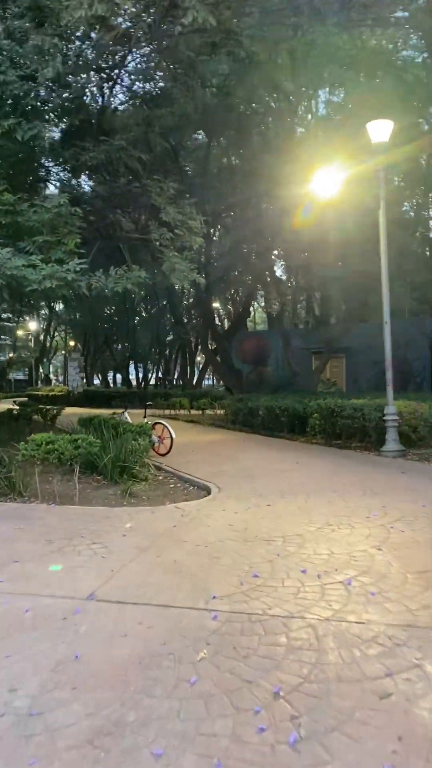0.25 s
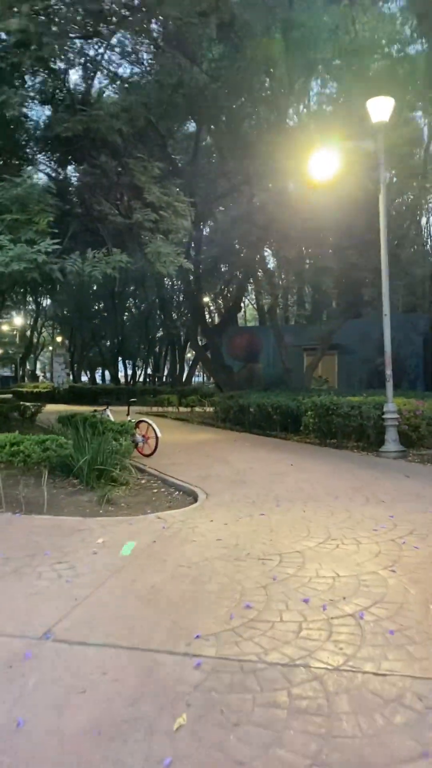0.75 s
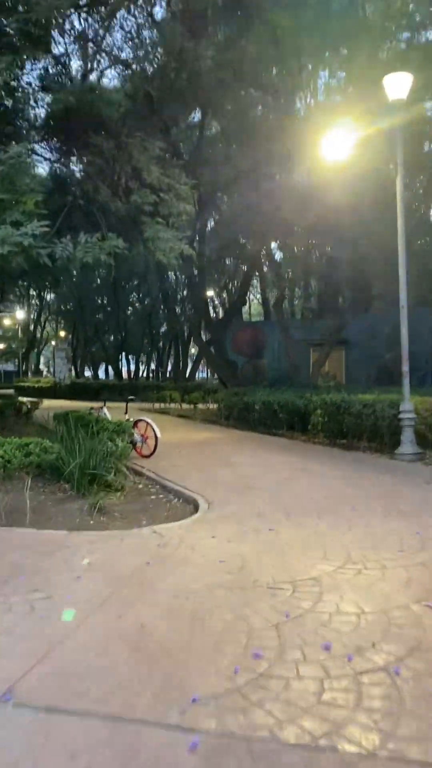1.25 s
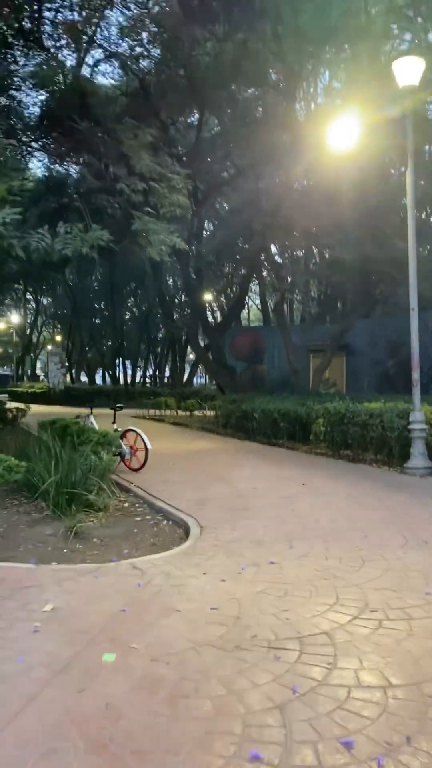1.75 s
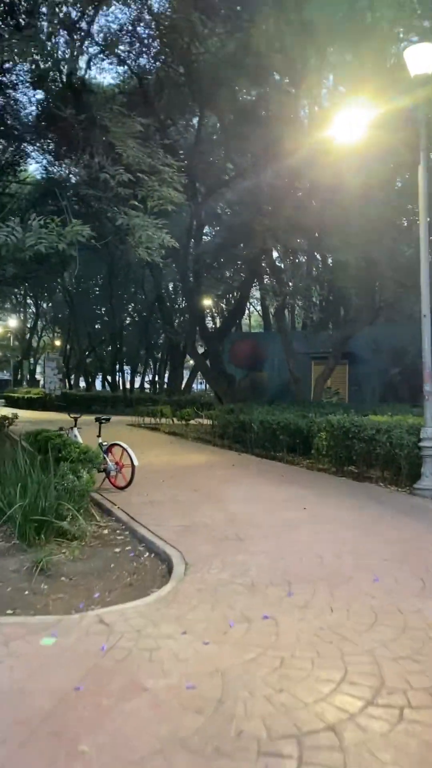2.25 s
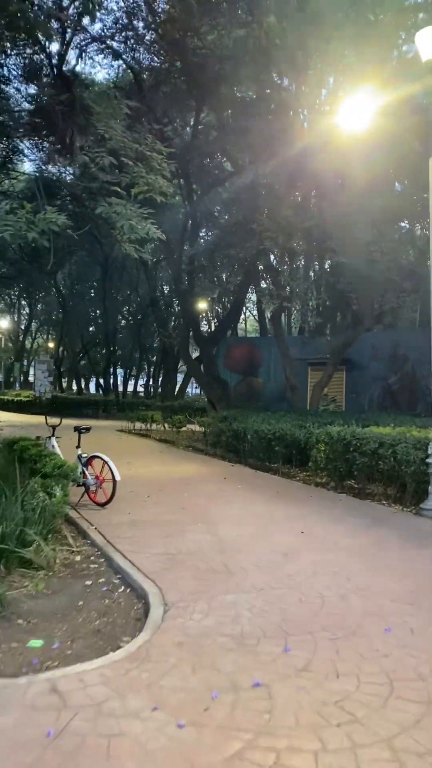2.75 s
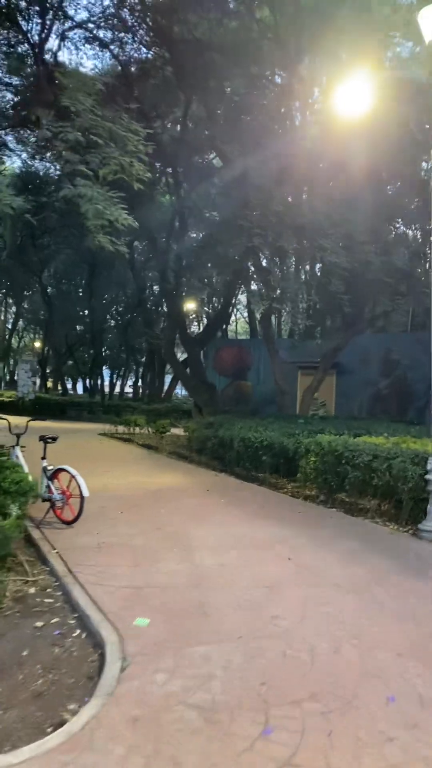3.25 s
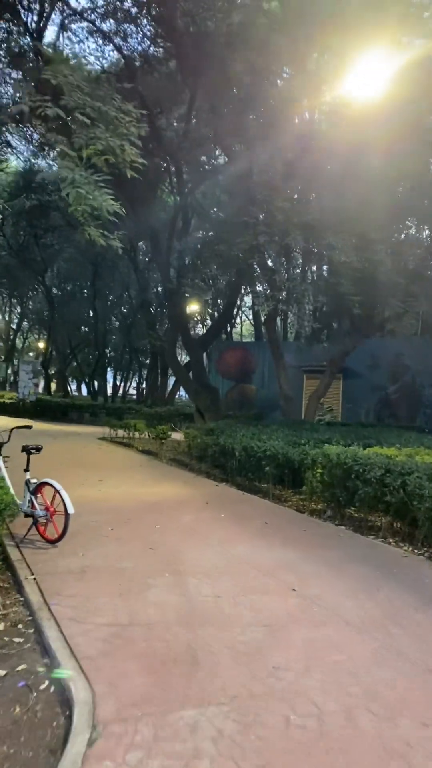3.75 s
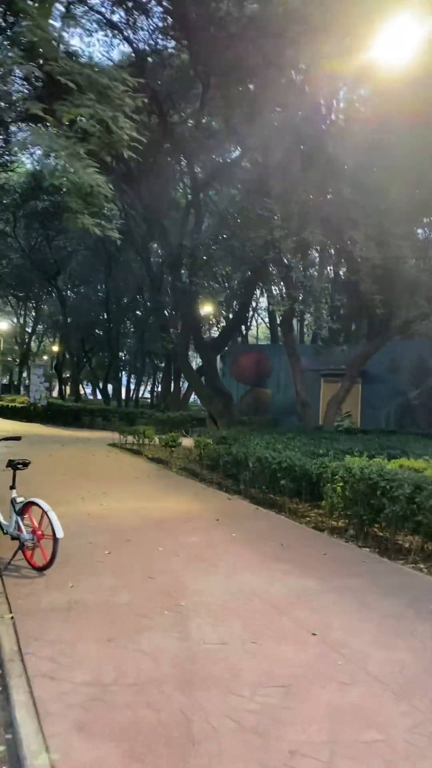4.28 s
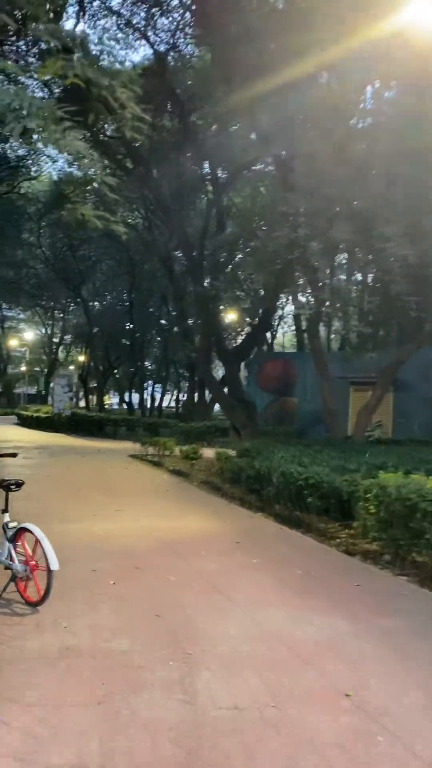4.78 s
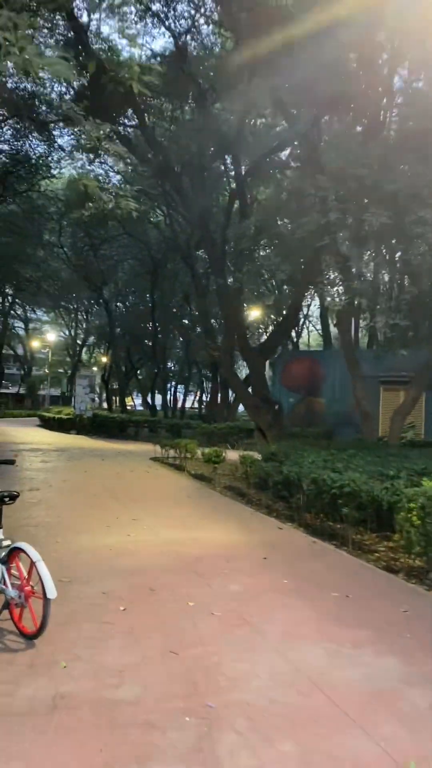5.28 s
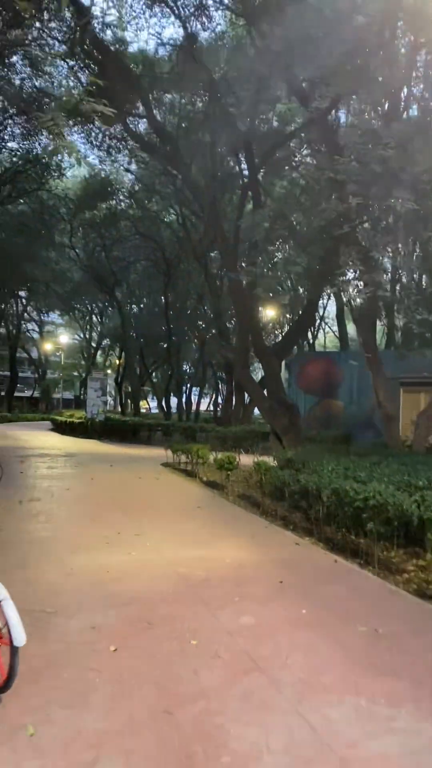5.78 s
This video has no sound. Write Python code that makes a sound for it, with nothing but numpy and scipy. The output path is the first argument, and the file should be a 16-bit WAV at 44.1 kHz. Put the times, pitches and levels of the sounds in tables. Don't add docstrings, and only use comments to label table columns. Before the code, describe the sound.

Outdoors in a tree-lined park, a low, lumpy traffic rumble runs throughout. Distant sparrows chirp in overlapping, echoing flurries, with sharper chirrups from trees beside the path. A close bird gives a quick bright phrase at about 2.5 seconds and repeats it near 4.5. Soft soles tick and scrape grit on paving, with dull low bumps, heard from a slow walker's handheld stereo microphone.

```python
import sys
import numpy as np
from scipy import signal
from scipy.fft import rfft, irfft
from scipy.io import wavfile
from scipy.ndimage import uniform_filter1d

SR = 44100
rng = np.random.default_rng(int(sys.argv[2]) if len(sys.argv) > 2 else 0)


def generate_wav(signal):
    frames = np.transpose(np.atleast_2d(signal))
    scaled = np.clip(frames, -1, 1) * 32767
    pcm = np.round(scaled).astype(np.int16)
    wavfile.write(sys.argv[1], SR, pcm)


def gain_from_db(level_db):
    decades = np.asarray(level_db, float) / 20
    return 10 ** decades


N = 265482


def in_time(rows):
    time_s, *columns = np.transpose(rows)
    return [np.interp(np.arange(N) / SR, time_s, column) for column in columns]


def at_hz(points):
    hz = np.maximum(np.arange(N // 2 + 1) * SR / N, 1)
    points = np.array(points)
    return np.interp(np.log(hz), np.log(np.maximum(points[:, 0], 1)), points[:, 1])


def rms_one(x):
    return x / np.sqrt(np.mean(x ** 2) + 1e-20)


def band(x, low_hz, high_hz, order=2):
    return signal.sosfilt(signal.butter(order, [low_hz, high_hz], "band", fs=SR, output="sos"), x)


def drift(rate, size):
    knots = rng.standard_normal(int(size * rate / SR) + 2)
    return np.interp(np.arange(size) * rate / SR, np.arange(len(knots)), knots)


def add(track, sound, start_s):
    i = int(start_s * SR)
    track[i:i + len(sound)] += sound[:max(N - i, 0)]


def ports(first, second, likeness):
    # pitch_hz, left_lead_rad
    phase = [(60, 0), (130, -1.3), (250, -1.5), (500, -1.5), (900, -2.2), (1290, -5), (1800, -5.7),
             (2760, -4.9), (3900, -5.1), (4650, -4.2), (5340, -5.8), (6030, -5.5), (7400, -4.7),
             (10200, -3.4), (12000, -3)]
    # pitch_hz, left_minus_right_db
    balance = [(60, 1.5), (160, 1), (410, 0), (1090, -4.5), (2500, 0), (4600, -4.5), (5700, 0),
               (7500, -0.5), (10500, -2)]
    left, other = rfft(first), rfft(second)
    tilt = gain_from_db(at_hz(balance) / 2)
    alike = np.clip(likeness, 0, 1)
    shared = alike * left * np.exp(-1j * at_hz(phase))
    right = shared + np.sqrt(1 - alike ** 2) * other
    return np.array([irfft(left * tilt, N), irfft(right / tilt, N)])


def city():
    # pitch_hz, level_db_per_hz
    city_colour = [(13, -37.5), (22, -12.5), (53, -1.5), (85, -1.5), (179, -15), (315, -22.5), (374, -25.5),
                   (568, -27), (783, -26.5), (1000, -32.5), (1810, -40.5), (2820, -43), (3980, -46),
                   (4610, -46), (7930, -74.5), (10300, -102), (17400, -120)]
    # pitch_hz, width_hz, over_rumble_db
    drones = [(62, 11, 2.5), (315.4, 24, 6), (493, 36, 6), (786.3, 19, 6.5)]
    # pitch_hz, likeness (0-1)
    port_likeness = [(60, 0.48), (130, 0.54), (250, 0.5), (450, 0.46), (900, 0.35), (1900, 0.6),
                     (4000, 0.92), (8000, 0.1)]
    # time_s, level_db
    traffic = [(0, 2.5), (.3, 2), (1.0, 1), (1.8, -0.5), (2.5, -2), (3.1, -1), (3.8, -1.5), (4.7, -2.5),
               (5.15, -1.5), (6.02, -2)]
    # time_s, depth_db
    ducks = [(.07, 8.5), (.70, 3.5), (1.23, 9.5), (1.36, 5), (1.90, 1.5), (2.28, -2), (3.17, 5.5),
             (5.12, 8), (5.47, 3), (5.78, 0)]
    duck_s = 0.046
    hz = np.arange(N // 2 + 1) * SR / N
    colour = gain_from_db(at_hz(city_colour))
    for centre_hz, width_hz, db in drones:
        colour = colour * gain_from_db(db / (1 + (2 * (hz - centre_hz) / width_hz) ** 2))
    pair = rfft(ports(*rng.standard_normal((2, N)), at_hz(port_likeness))) * colour
    part = np.digitize(hz, [130, 430, 1300])
    deep, low, middle, high = [rms_one(irfft(pair * (part == k), N)) for k in range(4)]
    swell_db, = in_time(traffic)
    t = np.arange(N) / SR
    ducked_db = sum(db * np.exp(-((t - s) / duck_s) ** 2) for s, db in ducks)
    deep_db = -41.5 + 1.5 * drift(11, N)
    low_db = -48.5 + swell_db - ducked_db
    middle_db = -55.5 + 0.8 * swell_db
    high_db = -64.5 + 1.1 * swell_db
    gusts = gain_from_db(1.4 * drift(6, N))
    upper = gain_from_db(middle_db) * middle + gain_from_db(high_db) * band(high, 500, 5700)
    return gain_from_db(deep_db) * deep + gain_from_db(low_db) * low + gusts * upper


def whistle(length_s, hz, waver, flutter_db, buzz):
    octave_db, breath_db = -32, -18
    size = int(length_s * SR)
    u = np.arange(size) / size
    pitch_hz = np.interp(u, np.linspace(0, 1, len(hz)), hz) * (1 + waver * drift(500, size))
    phase = 2 * np.pi * np.cumsum(pitch_hz) / SR
    beat_hz = 750 * (1 + .25 * drift(150, size))
    beat = 1 + buzz * np.sin(2 * np.pi * np.cumsum(beat_hz) / SR)
    breath = 1 + gain_from_db(breath_db) * drift(9000, size)
    shape = np.sqrt(2 * np.sin(np.pi * u)) * gain_from_db(flutter_db * drift(250, size))
    return shape * beat * breath * (np.sin(phase) + gain_from_db(octave_db) * np.sin(2 * phase))


def flock(level_db, low_hz, high_hz, count):
    out = np.zeros(N)
    for when, place, bend, slide, length, size in rng.random((count, 6)):
        glide = 1 + np.array([0, 0.23 * bend - .07, 0.34 * slide - .12])
        hz = glide * (low_hz + (high_hz - low_hz) * place ** 1.3)
        chirp = whistle(.02 + .04 * length, hz, waver=.025, flutter_db=4.3, buzz=0.16)
        add(out, gain_from_db(-8 * size) * chirp, when * N / SR)
    return gain_from_db(level_db) * rms_one(out)


def far_flocks():
    # time_s, level_db
    low_flock = [(0, -58.5), (.15, -68), (.36, -89.5), (.57, -63), (.75, -62.5), (.95, -67.5),
                 (1.22, -63.5), (1.6, -91), (2.0, -73), (2.55, -70), (3.3, -62.5), (3.62, -69.5),
                 (4.0, -64.5), (4.8, -77), (4.93, -62.5), (5.15, -62), (5.6, -76), (6.02, -69.5)]
    # time_s, level_db
    high_flock = [(0, -67), (.2, -95), (.55, -99), (.75, -75.5), (1.02, -83), (1.12, -68.5), (1.4, -80),
                  (1.8, -99), (1.95, -73.5), (2.3, -97), (2.47, -65), (2.7, -85.5), (2.93, -76),
                  (3.5, -80.5), (4.1, -86.5), (4.5, -80), (5.13, -73), (6.02, -96.5)]
    (low_db,), (high_db,) = in_time(low_flock), in_time(high_flock)
    return flock(low_db, 3200, 4700, count=600) + flock(high_db, 5100, 6300, count=300)


def birds(notes, waver, flutter_db, buzz):
    out = np.zeros(N)
    for s, length_s, *hz, db in notes:
        add(out, gain_from_db(db) * whistle(length_s, hz, waver, flutter_db, buzz), s)
    return signal.sosfilt(signal.butter(8, 7340, fs=SR, output="sos"), out)


def phrase(start_s, level_db, notes):
    early_share = 0.621
    placed = []
    for after_s, length_s, first_hz, last_hz, db in notes:
        middle_hz = first_hz + early_share * (last_hz - first_hz)
        placed.append((start_s + after_s, length_s, first_hz, middle_hz, last_hz, level_db + db))
    return placed


def further_birds():
    # start_s, length_s, pitch_hz, level_db
    held = [(0.101, 0.013, 3800, -59.5), (0.111, .023, 3180, -78), (0.172, 0.022, 3316, -61.5),
            (0.17, .022, 3870, -65.5), (.116, .01, 3850, -60), (.146, .012, 3440, -59),
            (.585, 0.04, 5350, -77.5), (.73, .03, 4300, -73.5), (0.582, 0.033, 6000, -74),
            (0.605, 0.037, 6130, -72.5), (.66, 0.056, 5630, -77), (0.68, 0.068, 6030, -78.5),
            (1.03, .046, 7300, -82), (1.048, 0.024, 3700, -68), (1.054, 0.014, 6400, -67.5),
            (1.074, .01, 6500, -71), (1.285, 0.02, 5300, -71.5), (1.291, 0.014, 4400, -67),
            (1.325, 0.037, 3800, -72), (1.937, 0.026, 4100, -67.5), (2.366, 0.026, 6200, -70.5),
            (3.1, 0.03, 2500, -75.5), (3.1, 0.016, 5300, -76.5), (2.836, .03, 4400, -75),
            (2.906, .04, 4900, -71), (2.905, .03, 5400, -78.5), (2.875, 0.035, 4370, -69),
            (2.78, .05, 7900, -81), (5.712, .018, 4650, -73), (5.692, .012, 3900, -70),
            (5.96, 0.018, 3450, -75), (3.079, 0.0098, 7700, -88), (3.08, 0.016, 4690, -67),
            (3.08, 0.015, 5170, -71.5), (3.099, 0.034, 4050, -66.5), (3.173, 0.072, 6070, -74.5),
            (3.70, 0.04, 5880, -76), (3.743, .05, 6080, -78.5), (4.4, 0.035, 4100, -78),
            (4.240, 0.077, 5940, -90), (4.892, 0.057, 4040, -67.5), (4.992, 0.06, 4270, -70.5)]
    # start_s, first_hz, pitch_change_percent, level_db
    strokes = [(0, 5900, -8, -74), (0, 4500, -7.5, -65.5), (0, 3500, 0.5, -69), (.045, 5800, 3.5, -75),
               (.079, 4400, -12.5, -64.5), (0.125, 3200, 5, -70.5), (.900, 3700, 11, -67.5),
               (1.020, 4920, 6, -74), (1.095, 4650, -3, -64.5), (1.13, 5420, -6.5, -70.5),
               (1.165, 3700, 6, -70), (1.175, 4870, 2.5, -71), (2.000, 3730, -11.5, -71),
               (3.15, 3900, -14, -66.5), (3.165, 3300, -3.5, -68.5), (3.839, 4100, -15.5, -67),
               (4.868, 4300, 4, -64), (4.895, 3750, -5, -68), (4.94, 4000, -4.5, -65),
               (5.095, 3200, -6.5, -66), (5.118, 2940, -8, -69), (5.696, 4000, 18.5, -76)]
    stroke_s = .024
    notes = [(s, length_s, hz, hz, db) for s, length_s, hz, db in held]
    notes += [(s, stroke_s, hz, hz * (1 + change / 100), db) for s, hz, change, db in strokes]
    return birds(phrase(0, 0, notes), waver=.022, flutter_db=3.5, buzz=.4)


def puff(level_db, decay_ms):
    t = np.arange(int(.12 * SR)) / SR
    out = rng.standard_normal(len(t)) * np.exp(-1000 * t / decay_ms)
    out[0] = 5
    return gain_from_db(level_db) * out


def steps():
    # start_s, peak_db, share_3_to_5_khz_db, decay_ms
    sole_ticks = [(0.0755, -49.5, -10, 1.7), (0.097, -50.5, -4.5, 2.3), (0.7026, -50, -10, 4.8),
                  (1.3199, -46, -21, 2.9), (1.342, -53.5, -17, 6.5), (1.43, -61, -11, 3.1),
                  (1.8945, -46, 2.5, 6.9), (2.0735, -54, 1.5, 4.6), (2.106, -58, -14, 2),
                  (2.3033, -54, 7.5, 1.4), (2.3145, -65, 5, 1.2), (2.3285, -50, 2, 1.5),
                  (2.5152, -49, -11, 5.5), (2.5253, -50, 5, 2.8), (2.5304, -50.5, -2.5, 5.6),
                  (2.6668, -57, 1, 2.5), (3.186, -56, -9, 3.3), (3.335, -58, 3, 2.5),
                  (3.8445, -48.5, -9, 2.1), (3.8684, -51, -25, 2.5), (3.9721, -53.5, -11.5, 6.2),
                  (4.646, -65, 0, 2.5), (5.103, -51, -6, 2.96), (5.1165, -53, -7, 2.5),
                  (5.13, -47, -8, 1.2), (5.727, -53, -14, 2.8), (5.746, -55, -12, 2.46),
                  (5.872, -62, -6, 1.5), (5.8544, -64, 5, 2.2), (5.9208, -61, -2, 2.13)]
    # start_s, level_db, decay_ms
    grit = [(.750, -86.5, 15), (1.444, -79, 13), (1.893, -67.5, 5.3), (1.905, -71.5, 19), (1.935, -80, 15),
            (2.074, -84.5, 3), (2.105, -78.5, 3), (2.208, -76, .8), (2.3035, -56, .8), (2.312, -72, .8),
            (2.318, -66, .8), (2.301, -72, .6), (2.3285, -57, .8), (2.351, -62, .7), (2.360, -73, 24),
            (2.730, -87, 30)]
    dull, sharp, bright = np.zeros((3, N))
    for s, db, sharp_db, decay_ms in sole_ticks:
        knock = puff(db, np.clip(decay_ms, .5, 5))
        add(dull, knock * gain_from_db(8.5), s)
        add(sharp, knock * gain_from_db(sharp_db + 7.5), s)
    for s, db, decay_ms in grit:
        add(bright, puff(db + 14, decay_ms), s)
    ticks = band(dull, 920, 3600, order=3) + band(sharp, 2900, 4900, order=3)
    ticks = ticks + band(bright, 5800, 10800, order=3)
    return ticks + 0.2 * np.roll(ticks, int(.00055 * SR))


def thuds():
    # centre_s, level_db, pitch_hz
    bumps = [(0.232, -31, 62), (1.436, -32, 60), (1.615, -30, 60), (2.01, -36, 64.7), (2.325, -32, 71),
             (3.24, -37.5, 69), (4.535, -28, 62), (5.199, -36, 61), (5.408, -34, 58.6), (5.78, -26.5, 63.7)]
    spread_s, phase_rad = 0.016, 0.36
    out, t = np.zeros(N), np.arange(-.05 * SR, .05 * SR) / SR
    for s, db, hz in bumps:
        bell = np.exp(-(t / spread_s) ** 2)
        add(out, gain_from_db(db + 0.5) * bell * np.cos(2 * np.pi * hz * t + phase_rad), s + t[0])
    return out


def chirrup(start_s, level_db, top_hz, length_s):
    arch_hz = [3404, 3564, 3700, 4025, 3533, 3300, 3150]
    spike_s, foot_hz, spike_db = 0.006, 4000, -3
    arch = (start_s + .003 - length_s / 2, length_s, *arch_hz, level_db - 3.0)
    spike = (start_s, spike_s, top_hz, (top_hz + foot_hz) / 2 + 150, foot_hz, level_db + spike_db)
    return [arch, spike]


def middle_birds():
    # spike_s, level_db, spike_top_hz, length_s
    chirrups = [(0.644, -58.5, 5280, 0.05), (1.088, -56.5, 5070, 0.054), (3.229, -58, 4720, .05),
                (3.764, -58, 4970, 0.055)]
    # start_s, length_s, first_hz, last_hz, level_db
    quick_strokes = [(0.65, 0.018, 4500, 4600, -60.5), (0.62, .01, 3550, 3200, -58),
                     (0.53, .008, 4400, 4200, -64), (0.94, .008, 3900, 4400, -64),
                     (0.84, 0.0083, 3900, 2500, -61), (.679, 0.011, 5000, 3100, -60),
                     (.697, 0.024, 3600, 4100, -61.5), (0.62, 0.018, 2700, 3830, -65),
                     (1.113, .007, 4600, 4300, -55), (1, 0.0098, 5000, 3300, -53),
                     (1.164, .008, 3000, 3400, -60), (0.99, .01, 5700, 5900, -67),
                     (1.1, 0.011, 6200, 5000, -72), (1.128, 0.019, 2900, 3070, -64.5),
                     (1.144, 0.014, 3900, 3700, -58), (1.3, 0.013, 4700, 2810, -60),
                     (1.124, 0.018, 4600, 5300, -65), (3.26, 0.015, 4300, 4000, -55),
                     (3.278, 0.009, 2900, 2500, -62.5), (3.238, .01, 3600, 3500, -63.5),
                     (3.297, 0.0073, 4700, 4300, -62), (3.291, 0.017, 3150, 4100, -56.5),
                     (3.330, 0.014, 4500, 3600, -65.5), (3.763, .012, 4000, 4700, -55),
                     (3.790, 0.013, 5600, 4300, -61.5), (3.776, 0.0092, 4450, 4600, -62),
                     (3.797, 0.018, 5000, 4550, -62), (3.812, 0.014, 4300, 5500, -64.5),
                     (3.4, 0.015, 3000, 3800, -60.5), (4.960, 0.018, 3500, 3200, -62.5),
                     (5.5, .018, 5800, 4200, -65.5), (4.979, .022, 2800, 3800, -65),
                     (5.030, 0.017, 3850, 4600, -65)]
    notes = [note for call in chirrups for note in chirrup(*call)] + phrase(0, 0, quick_strokes)
    return gain_from_db(2.5) * birds(notes, waver=.014, flutter_db=3.0, buzz=.2)


def close_bird():
    # long_note_s, level_db
    songs = [
        (2.480, -44),
        (4.557, -44),
    ]
    # after_s, length_s, first_hz, last_hz, level_db
    song_clear = [
        (.003, .03, 4523, 4543, 3),
        (0.088, .018, 5490, 5460, -10.5),
    ]
    # after_s, length_s, first_hz, last_hz, level_db
    song_buzzy = [(-.021, 0.023, 5350, 5600, -15.5), (-0.008, 0.01, 6000, 4900, -10.5),
                  (0.038, .017, 5000, 3400, -9), (0.054, 0.015, 4300, 6700, -10.5),
                  (.062, 0.033, 6600, 6800, -12.5), (0.062, 0.016, 6750, 6900, -14),
                  (0.083, .028, 7200, 5000, -20.5), (0.11, 0.019, 3480, 3600, -14),
                  (-0.023, 0.021, 3030, 3200, -22), (0.041, 0.02, 4550, 4700, -5),
                  (.004, 0.0087, 4400, 3400, -18), (0.097, 0.018, 5500, 4400, -13.5),
                  (0.077, 0.013, 2200, 3100, -23.5)]
    # after_s, length_s, first_hz, last_hz, level_db
    song_hoarse = [(.055, .032, 3750, 3450, -10), (.058, .008, 3400, 5700, -12),
                   (.034, 0.0055, 5200, 3800, -9.5), (-0.024, 0.006, 7000, 4900, -14.5),
                   (.104, .02, 5500, 5450, -15), (0.086, .009, 3400, 2400, -15.5)]
    # start_s, length_s, first_hz, last_hz, level_db
    song_changes = [(2.449, .013, 4100, 4250, -51.5), (2.474, 0.012, 3300, 4450, -49.5),
                    (2.51, 0.01, 4110, 3900, -49), (2.519, .011, 4300, 3940, -46),
                    (2.510, .022, 7950, 7900, -57.5), (4.538, 0.016, 3730, 4100, -56.5),
                    (4.536, 0.011, 5600, 6900, -57.5), (4.626, .014, 4500, 3300, -56),
                    (2.588, 0.015, 3520, 4400, -55.5), (4.55, 0.028, 3800, 4500, -50.5),
                    (4.58, .013, 4600, 3950, -42.5), (4.594, 0.023, 3830, 4000, -48),
                    (4.606, 0.015, 5000, 5660, -56), (4.614, 0.013, 4970, 2780, -50.5)]
    # spike_s, level_db, spike_top_hz, length_s
    close_chirrups = [
        (2.415, -49.5, 5180, .06),
        (4.491, -61.5, 5040, .062),
    ]
    clear, buzzy, hoarse = [[note for s, db in songs for note in phrase(s, db, template)]
                            for template in (song_clear, song_buzzy, song_hoarse)]
    clear += phrase(0, 0, song_changes)
    clear += [note for call in close_chirrups for note in chirrup(*call)]
    out = birds(clear, waver=.009, flutter_db=2.5, buzz=.1)
    out = out + birds(buzzy, waver=.03, flutter_db=3.5, buzz=.55)
    return out + birds(hoarse, waver=.035, flutter_db=5, buzz=.25)


def song_air():
    # start_s, length_s, level_db
    puffs = [
        (2.455, 0.087, -75.5),
        (2.565, .04, -77),
        (4.54, .08, -75.5),
    ]
    out = np.zeros(N)
    for s, length_s, db in puffs:
        size = int(length_s * SR)
        shape = np.sqrt(np.sin(np.pi * np.arange(size) / size))
        add(out, gain_from_db(db + 12 + 3.0 * drift(120, size)) * shape * rng.standard_normal(size), s)
    return band(out, 7000, 9600, order=6)


def coos():
    # start_s, length_s, first_hz, last_hz, level_db
    coo_notes = [(2.912, 0.025, 1250, 1340, -60), (2.919, 0.038, 1300, 1500, -67),
                 (5.763, 0.012, 760, 740, -56), (3.501, 0.13, 894, 914, -57.5),
                 (4.273, 0.056, 1320, 1263, -61.5)]
    return birds(phrase(0, 0, coo_notes), waver=.02, flutter_db=3, buzz=.1)


def sway(x, samples):
    shift = samples * uniform_filter1d(drift(60, N), size=300)
    return np.interp(np.arange(N) + shift, np.arange(N), x)


def trees(x):
    # pitch_hz, likeness (0-1)
    echo_likeness = [(2500, .45), (5300, .45), (6000, 0.5), (9000, 0.4)]
    near_t60_s, far_t60_s, dull_hz = 0.31, 0.81, 4000
    t = np.arange(int(1.3 * SR)) / SR
    noise = rng.standard_normal((2, 2, len(t))) * (1 - np.exp(-t / 0.00048)) / np.sqrt(SR)
    dull = signal.sosfilt(signal.butter(1, dull_hz, fs=SR, output="sos"), noise[1])
    near = gain_from_db(16) * noise[0] * gain_from_db(-60 * t / near_t60_s)
    far = gain_from_db(16.5) * dull * gain_from_db(-60 * t / far_t60_s)
    echoes = signal.fftconvolve(sway(x, 8)[None], near, axes=1)
    echoes = echoes + signal.fftconvolve(sway(x, 16)[None], far, axes=1)
    return ports(*echoes[:, :N], at_hz(echo_likeness))


def scene():
    rumble, far, further, ticks = city(), far_flocks(), further_birds(), steps()
    bumps = gain_from_db(np.array([[1.2], [-1.2]])) * thuds()
    middle = middle_birds()
    close = close_bird() + song_air()
    direct = close + middle + gain_from_db(2.0) * further + gain_from_db(-16.5) * far + ticks + coos()
    sent = gain_from_db(-7) * close + gain_from_db(-5) * middle + gain_from_db(5.0) * further + gain_from_db(-1.0) * far + gain_from_db(-8.5) * ticks
    return ports(direct, direct, 0.91) + trees(sent) + rumble + bumps


def low_pass(x):
    return signal.sosfilt(signal.butter(12, 15700, fs=SR, output="sos"), x)


def record(dry):
    hiss_db, whine_hz, whine_db = -87, 11900, -112
    soft = band(dry, 38, 7800)
    noise = ports(*rng.standard_normal(dry.shape), .6)
    hiss = gain_from_db(hiss_db) * band(noise, 3700, 9500)
    whine = gain_from_db(whine_db + 19.5) * band(noise, whine_hz - 150, whine_hz + 150)
    return low_pass(soft + hiss + whine)


dry = scene()
out = record(dry)
generate_wav(out)
```